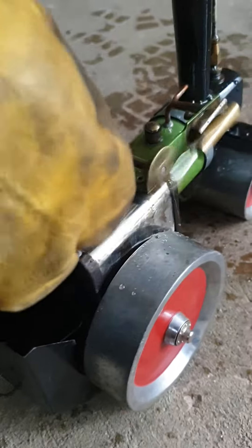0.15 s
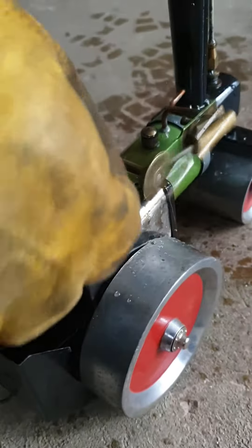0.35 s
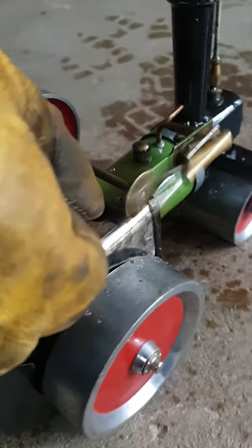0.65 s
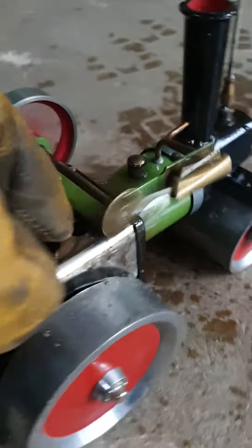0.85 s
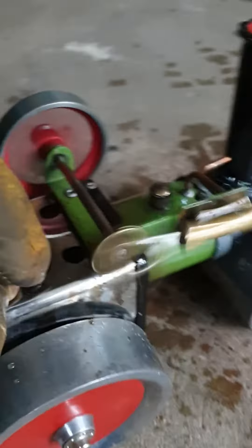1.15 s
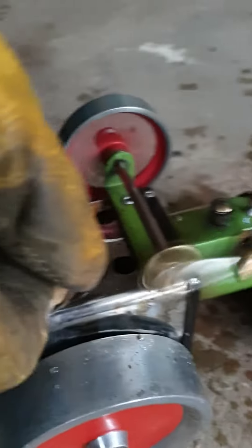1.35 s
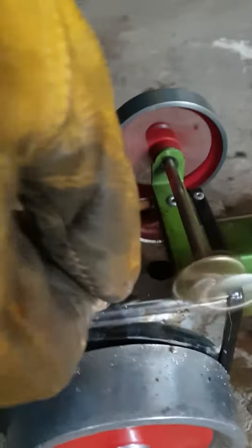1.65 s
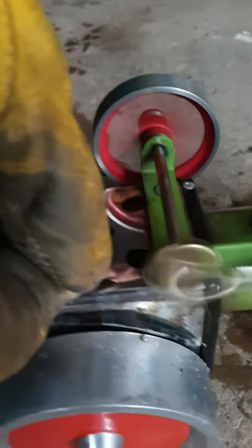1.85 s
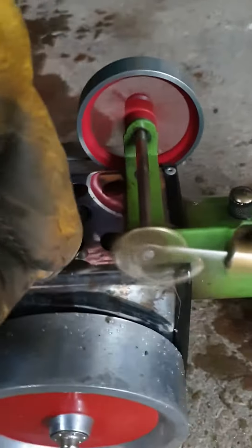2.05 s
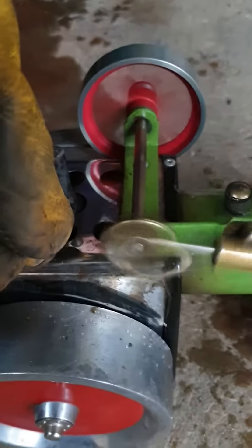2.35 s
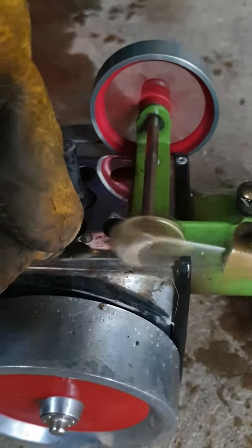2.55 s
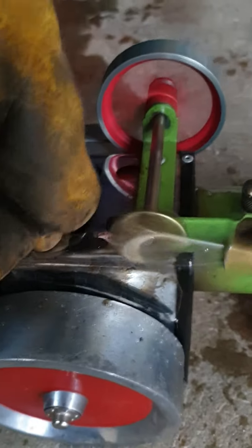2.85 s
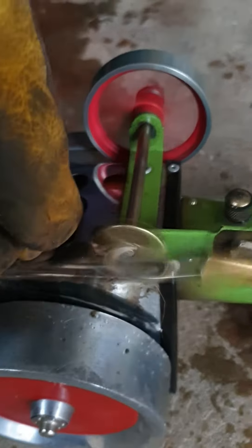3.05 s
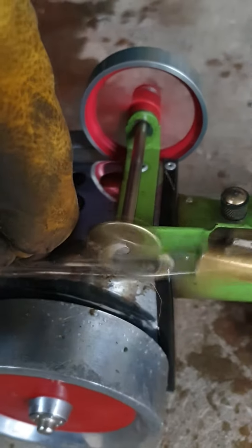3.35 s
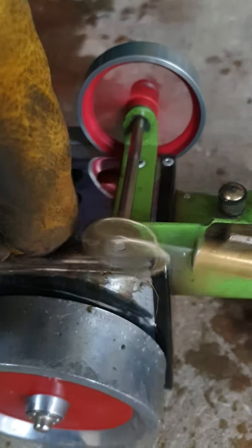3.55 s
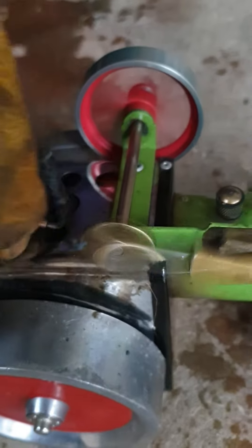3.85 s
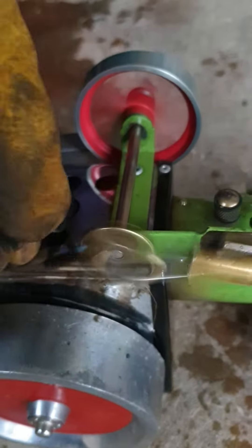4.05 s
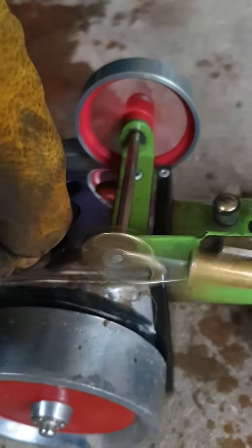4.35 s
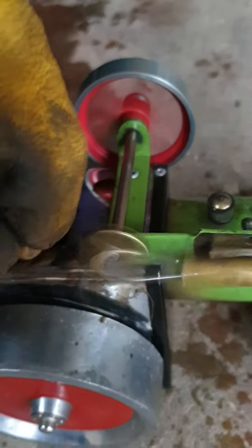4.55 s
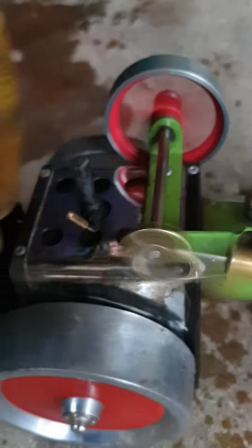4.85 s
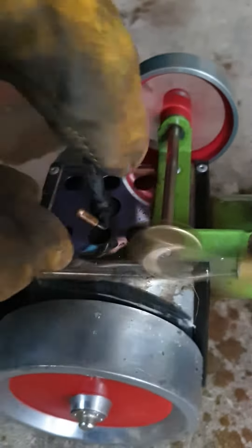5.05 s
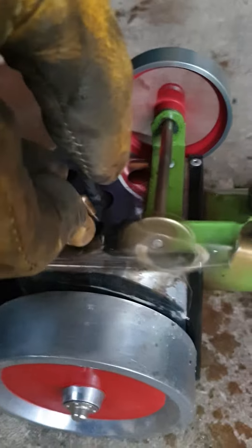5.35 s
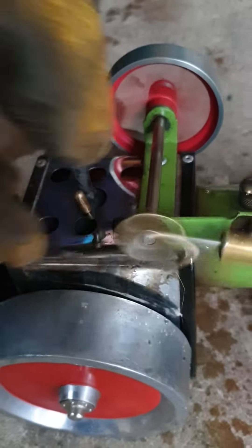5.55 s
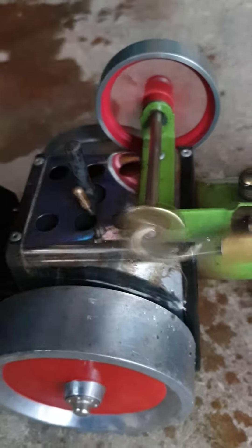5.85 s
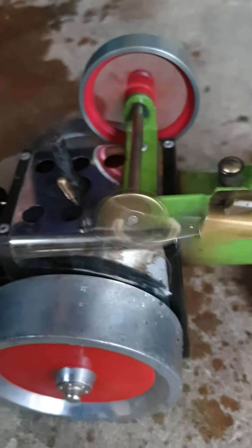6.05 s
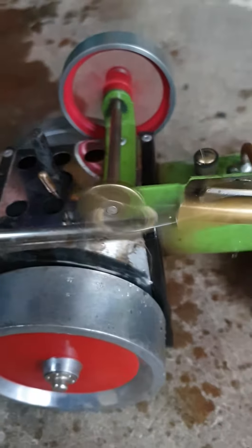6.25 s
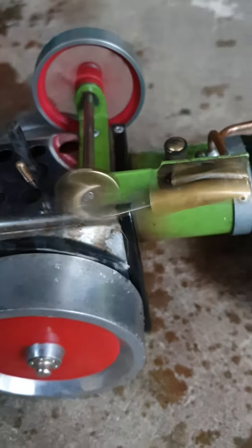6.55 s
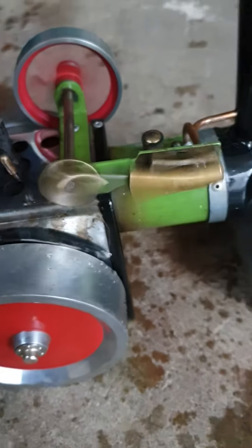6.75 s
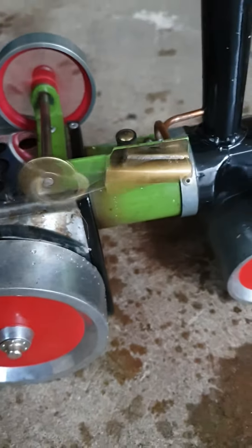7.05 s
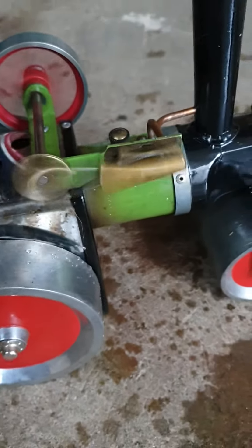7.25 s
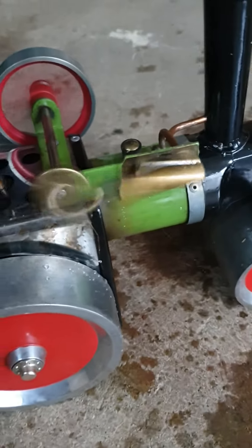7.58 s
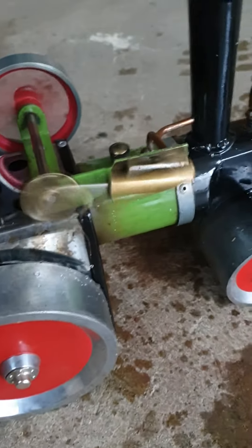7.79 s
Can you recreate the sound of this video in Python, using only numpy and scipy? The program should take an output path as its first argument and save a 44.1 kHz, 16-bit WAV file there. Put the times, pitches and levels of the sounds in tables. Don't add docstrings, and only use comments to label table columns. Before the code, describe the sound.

A handheld microphone stays near a small model steam engine, its fast metallic chatter and leaking steam constant. Early on a needle-thin, sputtering whistle opens, swelling and breaking with water drops before it stops. The beat then drops briefly as a hand grips the frame, with sharp chirps and crackling wet steam, before recovering; a dull thud hits the microphone near the end.

```python
import sys
import numpy as np
from scipy import signal
from scipy.io import wavfile
from scipy.ndimage import uniform_filter1d

SR = 44100
rng = np.random.default_rng(int(sys.argv[2]) if len(sys.argv) > 2 else 0)


def gain_from_db(level_db):
    decades = np.asarray(level_db, float) / 20
    return 10 ** decades


def log_audio(samples):
    frames = np.atleast_2d(samples).T
    limited = np.clip(frames, -1, 1)
    pcm = np.round(limited * 32767).astype(np.int16)
    wavfile.write(sys.argv[1], SR, pcm)


N = 349257
FREE_SPEED = 33


def rms_one(x):
    return x / np.sqrt(np.mean(x ** 2) + 1e-20)


def in_time(rows):
    s, *columns = np.transpose(rows)
    return [np.interp(np.arange(N) / SR, s, c) for c in columns]


def at_hz(points, hz):
    f, value = np.transpose(points)
    return np.interp(np.log(hz), np.log(f), value)


def coarse_drift(rate):
    r = np.exp(-40 * np.pi * rate / SR)
    settled = signal.lfilter([1], [1, -2 * r, r * r], rng.standard_normal(N // 20 + 2002))[2000:]
    return rms_one(settled)


def drift(rate):
    return np.interp(np.arange(N) / 20, np.arange(N // 20 + 2), coarse_drift(rate))


def held(coarse):
    return np.repeat(coarse, 20)[:N]


def swells(s, width, size):
    t = np.arange(0, N + 20, 20) / SR
    return held(np.exp(-.5 * ((t[:, None] - s) / width) ** 2) @ size)


def resonance(x, hz, width_hz):
    r = np.exp(-np.pi * width_hz / SR)
    zeros = np.array([1, 0, -1]) * (1 - r * r) / 2
    return signal.lfilter(zeros, [1, -2 * r * np.cos(2 * np.pi * hz / SR), r * r], x + 1e-18)


def placed(x, pan_db, lag):
    return np.array([np.roll(x, lag) * gain_from_db(pan_db / 2), x * gain_from_db(-pan_db / 2)])


def burst(turns, at, rise, fall, spread_db, wobble=0.015):
    count = np.floor(turns - at).astype(int) + 1
    chance = rng.standard_normal((count[-1] + 1, 2))
    late = wobble * (2 + np.clip(chance[count, 0], -2, 2))
    since = np.maximum((turns - at) % 1 - late, 0)
    return gain_from_db(spread_db * chance[count, 1]) * (1 - np.exp(-since / rise)) * np.exp(-since / fall)


def steam_noise(spectrum, patchy_db):
    # frequency in Hz, left-right likeness from -1 to 1.
    likeness = [(40, 0.7), (150, 0.88), (500, 0.72), (1200, .05), (2200, .42), (5000, .45), (9000, .25),
                (15000, 0.1)]
    # frequency in Hz, left-right level difference in dB.
    tilt = [(60, 5), (150, 22.5), (380, -8), (950, -1), (2380, 1), (5980, 0), (15000, 6.5)]
    out, edges = 0, 40 * 2 ** np.arange(0, 9, .4)
    white = rng.standard_normal((2, 2, N))
    for k, (low, high) in enumerate(zip(edges, edges[1:])):
        band = signal.butter(2, [low, high], "band", fs=SR, output="sos")
        mid, side = signal.sosfilt(band, white[k % 2])
        hz = np.sqrt(low * high)
        alike = np.clip(at_hz(likeness, hz), -1, 1)
        level_db = at_hz(spectrum, hz) + at_hz(tilt, hz) * np.array([[.5], [-.5]])
        gain = held(gain_from_db(patchy_db * coarse_drift(21.8))) * gain_from_db(level_db)
        out = out + gain * (np.sqrt(1 + alike) * mid + np.sqrt(1 - alike) * side * [[1], [-1]])
    return rms_one(out)


def exhaust(turns, puff_db, leak_db, braking):
    # frequency in Hz, level in dB per Hz.
    puff_spectrum = [(150, -51), (300, -24), (690, -14), (1010, -13.5), (1910, -9.5), (2400, -4),
                     (2900, -13), (3700, -12.5), (5000, -3), (7200, -11.5), (8700, -7), (11900, -6),
                     (15000, -11), (17000, -11)]
    # frequency in Hz, level in dB per Hz.
    leak_spectrum = [(30, -5), (60, -13), (380, -14.5), (690, -4), (900, -12), (1900, 0.5), (2400, -4.5),
                     (3100, -3), (3700, -2), (4400, -5.5), (6500, -9), (8500, -10), (11000, -8),
                     (17000, -19.5)]
    puff = burst(turns, .015, .014, .17, 1.3, wobble=.005)
    spit = burst(turns, .43, .005, .08, 2.5)
    gate = gain_from_db(-1.2 * braking) * puff + .5 * gain_from_db(1.5 + .15 * braking) * spit
    puffs = gain_from_db(puff_db - 1.5) * rms_one(gate) * steam_noise(puff_spectrum, patchy_db=2.5)
    ebb = 1 + .42 * np.cos(2 * np.pi * (turns - .25))
    return puffs + gain_from_db(leak_db + 6.5) * ebb * steam_noise(leak_spectrum, patchy_db=1.0)


def metalwork(turns, front):
    # frequency in Hz, bandwidth in Hz, level in dB.
    rear_modes = [(967, 16, -7), (1614, 16, 11.5), (1742, 18, 11.5), (2133, 110, 8.5), (2230, 62, 9),
                  (3030, 62, 6), (3330, 37, 13), (4640, 380, 2), (8650, 165, 4)]
    # frequency in Hz, bandwidth in Hz, level in dB.
    front_modes = [(1000, 50, -4), (1130, 70, -6), (1320, 50, -1), (1920, 90, 0), (2100, 60, 0),
                   (2750, 120, 2), (3030, 130, -1), (3400, 200, -5), (4900, 600, -11)]
    rattle = burst(turns, .05, .025, .12, 1.5) + .25 * burst(turns, .4, .02, .07, 2.5) + .06
    contacts = rattle * (rng.random((2, N)) < 7000 / SR) * rng.standard_normal((2, N))
    contacts = contacts + .3 * contacts[::-1]
    for at, force in ((.11, 1.5), (.19, 4.0), (.28, -1.2), (.43, .8)):
        strike = np.diff(np.floor(turns - at), prepend=9).clip(0, 1)
        contacts = contacts + force * gain_from_db(.8 * drift(12)) * strike

    def ring(modes):
        return rms_one(sum(gain_from_db(db) * resonance(contacts, hz, w) * (-1) ** k
                           for k, (hz, w, db) in enumerate(modes)))

    return np.sqrt(1 - front) * ring(rear_modes) + np.sqrt(front) * ring(front_modes)


def thump(turns, speed, front):
    # multiple of the crank speed, level in dB.
    rear_orders = [(1, -44), (2, -4.5), (3, -8.5), (4, -5.5), (5, -1), (6, -18), (7, -11), (8, -32),
                   (9, -11.5), (10, -9), (11, -11), (12, -16), (13, -15), (14, -46), (15, -8), (16, -5.5),
                   (17, -4.5), (18, -14), (19, -31), (20, -3), (21, -2), (22, -1), (23, -80), (24, -40),
                   (25, -41), (26, -40), (27, -23), (28, -6.5), (29, -28), (30, -14), (31, -19), (32, -20),
                   (33, -8), (34, -13), (37, -27)]
    # multiple of the crank speed, level in dB.
    front_orders = [(1, -37), (2, -4), (3, -0.5), (4, -7.5), (5, 1), (6, 2), (7, 8), (8, -24), (9, -60),
                    (10, -10), (11, -3), (12, -25), (13, -2), (14, -9), (15, -15), (16, -11), (17, -13),
                    (18, -7), (19, -1.5), (20, -6), (21, 3.5), (22, -5.5), (23, -63), (24, -56), (25, -49),
                    (26, -40), (27, -39), (28, -12), (29, -10), (30, -10), (31, 7), (32, -3), (33, 2),
                    (34, -4), (35, -1), (36, -15), (37, -9)]
    rocking_db = [1, 3, 1.07, 1.5, -1.5, 0.1, -1, -0.5]
    out, speed, front = 0, speed[::20], front[::20]
    rear, ahead = np.transpose(rear_orders), np.transpose(front_orders)
    load = np.maximum(FREE_SPEED - speed, 0)
    for k in range(1, 38):
        low = k < 9
        at = .52 if low else .22
        rear_db = np.interp(k * speed / 33.8, *rear)
        front_db = np.interp(k * speed / 32.3, *ahead)
        rocking = rocking_db[k - 1] * load if low else 0
        level_db = rear_db + front * (front_db - rear_db) + rocking
        level = gain_from_db(level_db + 1.0 * coarse_drift(7.5)[:len(speed)])
        scatter = (.25 if low else 1.2) * rng.standard_normal() + .012 * k * coarse_drift(3.9)
        out = out + held(level) * np.cos(2 * np.pi * k * (turns - at) + held(scatter))
    return rms_one(out)


def whistle():
    # time in seconds, level in dB, left-right difference in dB.
    lever = [(1.089, -17, -1), (1.27, -17, -8), (1.52, -14, -1.5), (1.68, -19, -0.5), (1.927, -22.5, -1.5),
             (2.57, -22.5, 2.5), (3.123, -27, 4.5), (4.457, -26.5, 7), (4.545, -42, 5)]
    # time in seconds, pitch in Hz.
    pitch_curve = [(1.094, 7442.0), (1.536, 7484.0), (1.565, 7311.0), (1.997, 7355.0), (2.173, 7620.0),
                   (2.68, 7612.0), (3.03, 7475.0), (3.43, 7437.0), (3.62, 7335.0)]
    # time in seconds, half width in seconds, level in dB, left-right in dB.
    surges = [
        (1.104, 0.0067, -2, -14),
        (2.121, 0.043, 2, -7),
        (2.161, 0.018, -2.5, 9),
        (2.306, 0.012, -5, -8),
        (2.46, 0.036, -0.5, -6),
        (2.733, 0.027, 2, -5),
        (2.854, 0.057, 10.5, -2),
        (3.712, 0.082, 11, -6.5),
        (3.812, 0.044, -8, 0),
        (4.026, 0.18, 8.5, -3),
    ]
    # time in seconds, half width in seconds, pitch shift in Hz.
    flutters = [
        (1.334, 0.033, -88.1),
        (1.81, 0.04, 68.8),
        (2.296, 0.022, -76.9),
        (2.443, 0.016, -61.2),
        (2.729, 0.024, -66.6),
        (2.864, 0.015, -44.2),
        (3.95, 0.035, 41.3),
        (4.021, 0.017, 112.5),
        (4.237, 0.052, -47.2),
        (4.51, 0.023, -123.8),
    ]
    # time in seconds, level change in dB.
    gulps = [(1.138, -9), (1.185, 1), (1.202, -4), (1.228, -3), (1.263, -7), (1.61, -2), (1.843, -5),
             (1.94, -5), (1.985, -8), (2.037, -4), (2.143, -16), (2.201, -5), (2.326, -10), (2.34, -4),
             (2.406, -5), (2.486, -7), (2.622, -10), (2.638, -6), (2.695, -16), (2.926, -5), (2.977, -5),
             (2.994, -8), (3.008, -5), (3.111, -1), (3.157, -13), (3.203, -9), (3.258, -15), (3.28, -5),
             (3.385, -4), (3.409, -5), (3.434, -2), (3.492, 1), (3.799, -10), (3.946, -4), (4.253, -8),
             (4.335, 0), (4.382, -5), (4.433, -3), (4.458, 1)]
    # time in seconds, half width in seconds, level in dB.
    overblown = [(1.15, .05, -38), (1.32, 0.08, -44), (1.48, 0.04, -40), (1.62, 0.066, -53),
                 (1.851, 0.15, -50), (2.12, 0.033, -45), (2.44, .015, -36), (2.7, 0.18, -52),
                 (3.1, .08, -47), (3.4, 0.11, -47), (3.7, 0.051, -50), (3.93, .05, -44), (4.06, .05, -42),
                 (4.4, 0.096, -54)]
    t, (db, pan_db) = np.arange(N) / SR, in_time(lever)
    s, width, swell_db, swing_db = np.transpose(surges)
    swell = swells(s, width, swell_db)
    wet_db = 5 / (1 + np.exp((2.41 - t) / .18))
    rush_db = -33 + .28 * (db - db.min() - 21) + wet_db + .26 * swell
    gulp_s, gulp_db = np.transpose(gulps)
    db = db + swell + swells(gulp_s, .0037, gulp_db)
    pan_db = pan_db + swells(s, width, swing_db)
    s, width, octave_db = np.transpose(overblown)
    octave_gain = swells(s, width, gain_from_db(octave_db))
    pitch = in_time(pitch_curve)[0] + swells(*np.transpose(flutters))
    phase = 2 * np.pi * np.cumsum(pitch + 17 * drift(30) + 24 * drift(110)) / SR
    open_s, speak_s, shut_s, fade_s = 1.086, .003, 4.55, .017
    on = 1 - np.exp(-np.maximum(t - open_s, 0) / speak_s)
    on = on * np.exp(-np.maximum(t - shut_s, 0) / fade_s)
    lead = .93 + .058 * drift(6.1)
    jet = 1 + .07 * drift(22) + .1 * (drift(100) + 1j * drift(100))
    treble = signal.butter(2, 9200, "high", fs=SR, output="sos")
    out = []
    for side in (.5, -.5):
        skirt = 0
        for depth, rate in ((.06, 40), (.03, 150), (.017, 400)):
            skirt = skirt + depth * (drift(rate) + 1j * drift(rate))
        tone = gain_from_db(db) * (jet + skirt) * np.exp(1j * (phase + side * lead))
        octave = octave_gain * (jet + 2 * skirt) * np.exp(2j * (phase + side * lead))
        rush = rms_one(resonance(resonance(rng.standard_normal(N), 7397, 155), 8450, 1370))
        hiss = rms_one(signal.sosfilt(treble, rng.standard_normal(N)))
        rush = gain_from_db(rush_db + 1.5 * drift(8)) * (rush + gain_from_db(-6) * hiss)
        out.append(on * gain_from_db(side * pan_db) * (gain_from_db(4.2) * (tone + octave).real + rush))
    return np.array(out)


def squeak(turns):
    # time in seconds, peak level in dB, frequency in Hz.
    chirps = [(2.864, -26, 1940), (3.558, -26.5, 1940), (3.7405, -30, 1860), (3.8004, -27, 1920),
              (4.0494, -26, 1870), (4.202, -26.5, 1824), (4.529, -42, 1900), (4.623, -41, 1920),
              (4.7836, -20, 1870), (4.8437, -25.5, 2010), (4.908, -25, 1920), (5.0017, -21.5, 1926),
              (5.07, -20, 1933), (5.3033, -20, 1940), (5.377, -19, 1845), (5.6464, -26, 1950),
              (5.727, -18, 2000), (5.7629, -25, 2055), (5.867, -24, 1970), (6.0083, -51, 1900),
              (6.103, -28, 1830), (6.7282, -25, 1930), (6.825, -25, 1780), (6.8868, -19.5, 1900),
              (7.232, -32, 1960), (7.2653, -26, 2100), (7.3357, -18, 1860), (7.6052, -23, 1970),
              (7.7936, -21, 1820), (7.8501, -26, 1990)]
    out, t = np.zeros(N + 1500), np.arange(1500) / SR
    shape = (1 - np.exp(-t / .0025)) * np.exp(-t / .0067)
    for s, db, hz in chirps:
        rub = resonance(rng.standard_normal(len(t)), hz, 320)
        chirp = np.sin(2 * np.pi * hz * t) + .5 * rms_one(rub)
        out[round(s * SR):][:len(t)] += gain_from_db(db + 5.5) * shape * chirp
    stroke = burst(turns, .025, .077, .23, 2.7) + burst(turns, .46, .012, .13, 1.5)
    rub = stroke * rng.standard_normal((2, N))
    rub = rub + .4 * rub[::-1]
    s, db, _ = np.transpose(chirps)
    loose = gain_from_db(-47) + swells(s, .32, gain_from_db(db - 35))
    return out[:N] + loose * rms_one(resonance(resonance(rub, 1903, 230), 1903, 230))


def spits():
    # time in seconds, peak in dB, part under 6 kHz in relative dB, left-right in dB.
    cracks = [(2.4374, -13, -20, 1.5), (5.002, -19, -4, 20), (5.065, -15.5, 0, 22), (5.098, -20.5, 15, 20),
              (5.1662, -20.5, -4, 20), (5.303, -24, 7, 16), (5.338, -14.5, 0, 15), (5.479, -20, 6, 15),
              (5.4426, -15, 18, 11), (5.762, -17, -10, 10), (5.8335, -18.5, 0, 9), (5.867, -22.5, -8, 5.0),
              (5.9726, -14.5, -7, 10), (6.0664, -18, 1, 0), (5.036, -18, -3, 17), (5.2825, -21, 2, 16),
              (5.409, -19.5, 11, 10), (6.248, -21, 2, 14), (6.19, -28, 5, 5), (4.909, -24, -4, 8),
              (7.5105, -24, 0, 2), (7.603, -23, -5, 2), (7.697, -18, 0, 4), (6.2906, -15.5, -2, 11),
              (6.4455, -18, -2, 9), (6.8952, -15, -4, 13), (7.46, -17.5, 13, 16)]
    out, t = np.zeros((2, N)), np.arange(900) / SR
    for s, db, low_db, pan_db in cracks:
        crack = rng.standard_normal(len(t)) * (np.exp(-t / .0006) + .3 * np.exp(-t / .004))
        bright = resonance(crack, 9500, 3300) + gain_from_db(low_db) * resonance(crack, 5600, 1200)
        i = round(s * SR)
        out[:, i:i + len(t)] += placed(gain_from_db(db) * bright / np.abs(bright).max(), pan_db, lag=0)
    return out


def bumps():
    # time in seconds, peak level in dB, frequency in Hz, decay time to -60 dB in seconds.
    knocks = [(0.35, -28, 172, 0.12), (1.089, -36, 84, 0.16), (2.08, -33, 51.1, 0.15),
              (2.287, -41, 121, 0.14), (2.799, -34, 164, 0.1), (3.648, -44.5, 60, 0.17),
              (4.048, -56, 64.6, 0.16), (7.05, -15, 175, 0.069), (7.098, -22, 211, 0.075),
              (2.83, -33, 77, 0.09), (3.1, -34, 48, 0.16), (2.47, -36, 56, .12), (5.229, -24, 1240, 0.068),
              (5.232, -26, 1130, .07), (7.062, -24.5, 270, 0.091)]
    out, t = np.zeros(N), np.arange(9000) / SR
    for s, db, hz, t60 in knocks:
        shape = (1 - np.exp(-t / .018)) * gain_from_db(-60 * t / max(t60, .03))
        rub = rms_one(resonance(rng.standard_normal(len(t)), 1.7 * hz, .9 * hz))
        out[round(s * SR):][:len(t)] += gain_from_db(db + 3) * shape * (.8 * np.sin(2 * np.pi * hz * t) + .6 * rub)
    return out


def draught():
    return gain_from_db(-62 + 4.3 * drift(2.7)) * rms_one(resonance(rng.standard_normal((2, N)), 38.3, 25))


def shed():
    noise = rng.standard_normal((3, N))
    murmur = resonance(noise[:2] + 1.06 * noise[2], 357, 350)
    return gain_from_db(-56) * rms_one(resonance(murmur, 357, 350))


def scene():
    # time in seconds, turns per second.
    speed_curve = [(0.0, 33.897), (2.0, 33.45), (2.5, 33.164), (3.2, 33.183), (4.0, 32.621), (4.94, 32.353),
                   (5.1, 30.168), (5.4, 28.466), (5.65, 27.905), (5.85, 28.29), (6.5, 30.782),
                   (7.3, 32.186), (7.92, 32.49)]
    # time in seconds, level in dB, chimney side in view from 0 to 1, left-right in dB.
    view = [(0, -1, 0, -7), (1.06, 0.5, 0.07, -5.5), (1.2, -4, 0.2, -5.5), (1.6, -7, 0.27, -5.5),
            (2.6, -6.5, 0.23, -3), (4.4, -6, 0.43, -5.5), (5, -5, 0.45, -3), (5.6, -5.5, 0.54, -1),
            (6.3, -5, 0.82, -3), (6.7, -2.5, 0.72, -3), (7.1, -2, 0.86, -2), (7.5, -1, 0.71, -3.5),
            (7.92, -1.5, 0.76, -3)]
    # time in seconds, gain in dB.
    hard_strokes = [(.085, 3), (.143, 0.5), (.202, 0.5), (.262, 1), (.321, 1), (.411, 1.5), (5.859, 1),
                    (6.034, 2.5), (6.103, 3.5), (6.698, 3.5), (6.762, 3.5), (6.889, 2), (7.513, 0.5),
                    (7.577, 0), (7.605, 1.5), (7.638, 2), (7.70, 2), (7.792, 0.5), (7.883, 0.5)]
    # level close up in dB, share of the view's level, dB per full turn to the chimney side,
    # dB per turn/s lost to load.
    thump_law = (-31, 1.09, -1, -1)
    metal_law = (-34, 2.3, 2.5, -0.13)
    puff_law = (-32, 1.13, -0.5, 1.52)
    leak_law = (-35, 1.19, -0.5, -0.33)
    speed = in_time(speed_curve)[0]
    turns = .34 + np.cumsum(speed) / SR
    near_db, front, pan_db = in_time(view)
    front, load = np.clip(front, 0, 1), np.maximum(FREE_SPEED - speed, 0)

    def law_db(law):
        db, share, turned_db, load_db = law
        return db + share * near_db + turned_db * front + load_db * load

    braking = uniform_filter1d(np.maximum(-np.gradient(speed) * SR, 0), size=3000)
    metal = gain_from_db(law_db(metal_law)) * metalwork(turns, front)
    steam = exhaust(turns, law_db(puff_law), law_db(leak_law), braking) + squeak(turns)
    steam[0] = np.roll(steam[0], -15)
    grip_db = swells(np.array([5.0]), .035, [-8])
    shaking = gain_from_db(law_db(thump_law) - 5.5 + grip_db) * thump(turns, speed, front)
    frame = placed(shaking, -1.3, lag=-2)
    hard_s, hard_db = np.transpose(hard_strokes)
    lean = gain_from_db(pan_db * np.array([[.3], [-.3]]))
    engine = lean * gain_from_db(swells(hard_s, .0025, hard_db)) * (metal + steam) + frame
    return engine + whistle() + spits() + bumps() + draught() + shed()


def low_pass(x):
    return signal.sosfilt(signal.butter(12, 16200, fs=SR, output="sos"), x)


def record(dry):
    # frequency in Hz, width in Hz, depth from 0 to 1.
    band_dips = [(2340, 108, 0.9), (3464, 260, 0.73), (5860, 830, 0.42)]
    for hz, width_hz, depth in band_dips:
        dry = dry - np.clip(depth, 0, 1) * resonance(dry, hz, width_hz)
    cut = signal.ellip(10, .5, 60, 16050, fs=SR, output="sos")
    return low_pass(signal.sosfilt(cut, dry))


dry = scene()
out = record(dry)
log_audio(out)
```